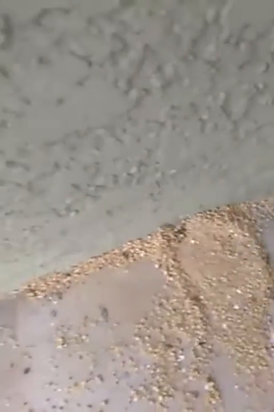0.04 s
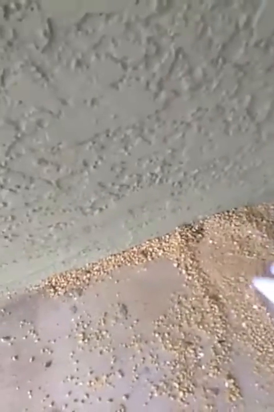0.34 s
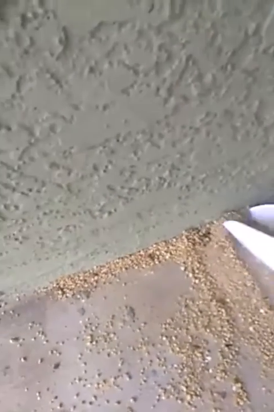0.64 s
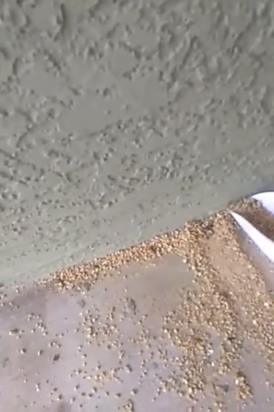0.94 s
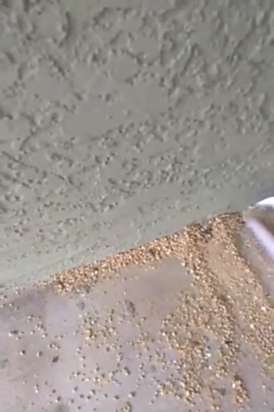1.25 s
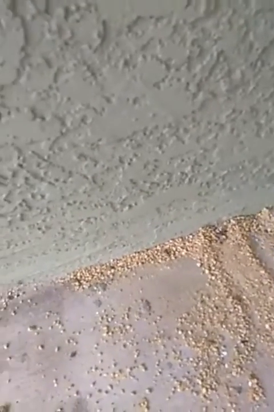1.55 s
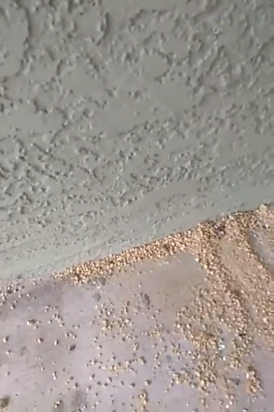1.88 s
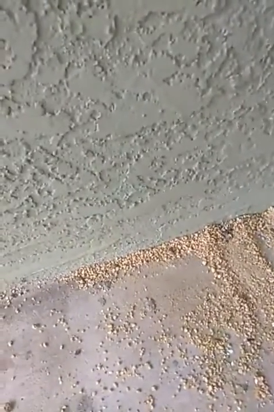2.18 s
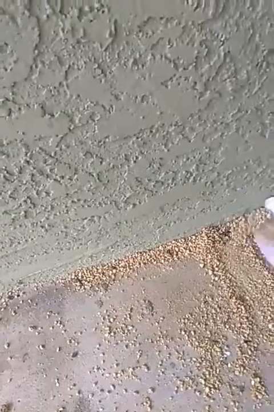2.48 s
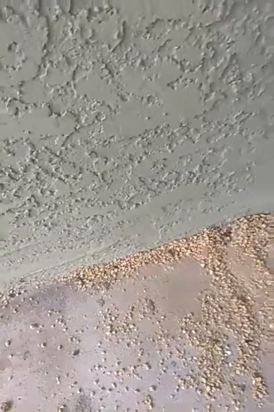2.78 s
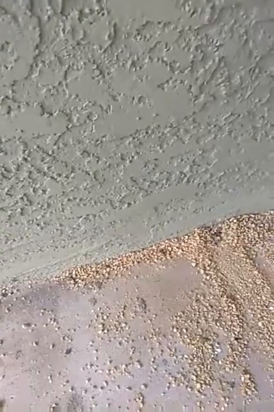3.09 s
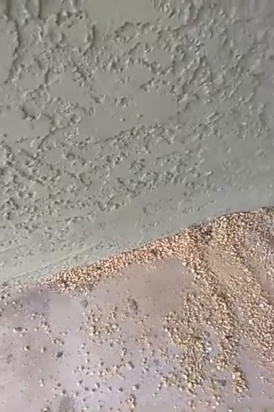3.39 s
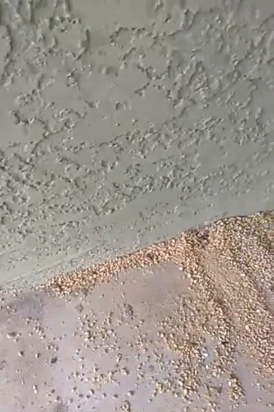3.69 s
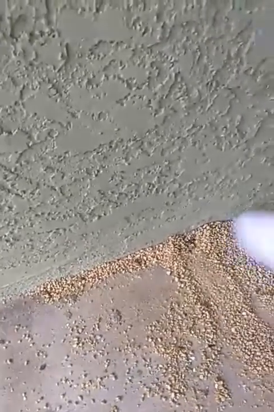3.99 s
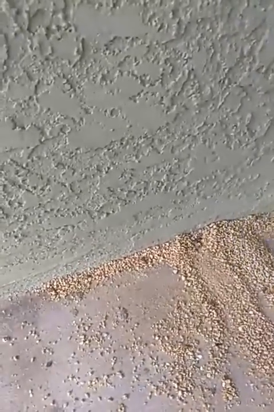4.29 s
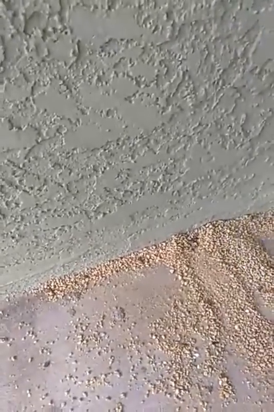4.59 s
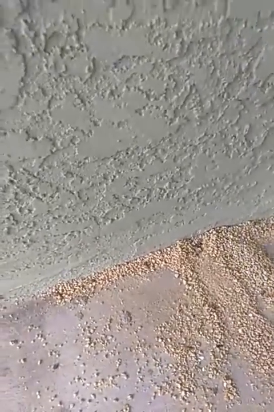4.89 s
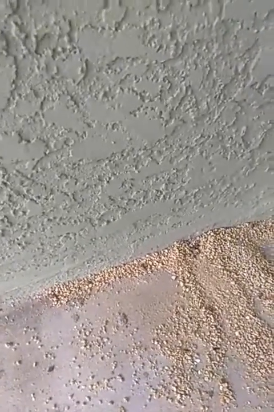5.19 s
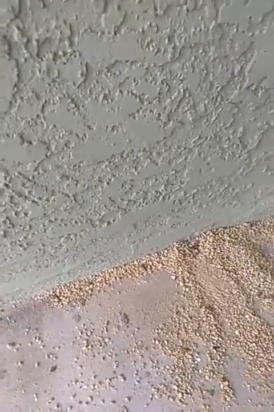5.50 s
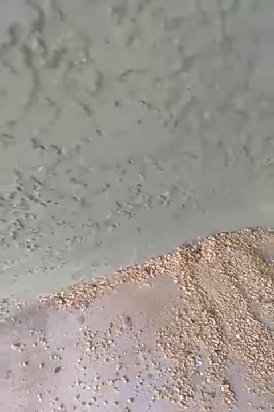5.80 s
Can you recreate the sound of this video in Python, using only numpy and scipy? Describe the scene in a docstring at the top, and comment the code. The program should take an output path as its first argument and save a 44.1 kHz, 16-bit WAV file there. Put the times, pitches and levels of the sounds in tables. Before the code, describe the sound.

Dry kernels crackle and rattle as a plastic bowl scrapes over a concrete floor, gently at first, then in three loud strokes.

```python
"""Scooping grain off concrete

A plastic bowl scoops loose grain beside a wall: light nudges, then three hard scrapes. Kernels crackle
under the rim and tick against the bowl, whose resonances change with each new grip; fine grit trickles
after every push. Far traffic rumbles underneath, and a distant bird chirps once."""
import sys
import numpy as np
from scipy import signal
from scipy.fft import rfft, irfft, next_fast_len
from scipy.io import wavfile
from scipy.ndimage import uniform_filter1d, map_coordinates

SR = 44100
rng = np.random.default_rng(int(sys.argv[2]) if len(sys.argv) > 2 else 0)


def unload_wav(signal):
    """Save mono or channel-first audio to the path in sys.argv[1] as 16-bit WAV at rate SR, clipped to [-1, 1]."""
    wavfile.write(
        sys.argv[1],
        SR,
        np.round(np.clip(np.atleast_2d(signal).T, -1, 1) * 32767).astype(np.int16),
    )


N = 266805


def amp(db):
    """Decibels to gain."""
    return 10 ** (np.asarray(db) / 20)


def unit(x):
    """Scale to rms 1."""
    return x / np.sqrt(np.mean(x ** 2) + 1e-20)


def add(track, sound, start_s):
    """Lay a sound into a track."""
    part = track[:, round(start_s * SR):][:, :sound.shape[1]]
    part += sound[:, :part.shape[1]]


def along(points, hz):
    """Read each column after the frequency at hz, on a log axis."""
    freqs, *columns = np.transpose(points)
    return np.squeeze([np.interp(np.log(hz + 1), np.log(freqs + 1), column) for column in columns])


def automation(rows):
    """Read each column after the time at every sample."""
    times, *columns = np.transpose(rows)
    return np.array([np.interp(np.arange(N) / SR, times, column) for column in columns])


def wobble(rate, size=N):
    """A smooth random curve, rate knots a second."""
    knots = rng.standard_normal(int(size * rate / SR) + 4)
    return map_coordinates(knots, [np.arange(size) * rate / SR])


def filtered(x, response):
    """Equalise x with a gain given as a function of frequency."""
    size = next_fast_len(N + SR // 2)
    return irfft(rfft(x, size) * response(np.fft.rfftfreq(size, 1 / SR)), size)[..., :N]


def convolved(x, ring):
    """Pass x through one impulse response or a pair."""
    return signal.oaconvolve(np.atleast_2d(x), np.atleast_2d(ring), axes=1)[:, :x.shape[-1]]


def colour(eq_db, size=4096):
    """The minimum-phase impulse response, of energy 1, shaped like this EQ curve."""
    gain = amp(eq_db(np.fft.rfftfreq(size, 1 / SR)))
    cepstrum = irfft(np.log(np.maximum(gain, 1e-6)))
    cepstrum[1:size // 2] *= 2
    cepstrum[size // 2 + 1:] = 0
    ring = irfft(np.exp(rfft(cepstrum)))
    return ring / np.linalg.norm(ring)


def shaped_noise(eq):
    """A pair of noises, rms 1, shaped by an EQ table."""
    return unit(filtered(rng.standard_normal((2, N)), lambda hz: amp(along(eq, hz))))


def narrow_noise(hz, width_hz, size=N):
    """A pair of narrow noises, rms 1: a resonance under random drive."""
    phase = 2 * np.pi * hz * np.arange(size) / SR
    pair = [wobble(width_hz, size) * np.cos(phase) + wobble(width_hz, size) * np.sin(phase)
            for _ in range(2)]
    return unit(np.array(pair))


def burst(t60, size=2048):
    """A pair of dying noises of energy 1: one contact and its scatter."""
    x = rng.standard_normal((2, size)) * amp(-60 * np.arange(size) / SR / t60)
    return x / np.linalg.norm(x, axis=1, keepdims=True)


def grains(size, rate, spread_db, clump_db, t60, spots):
    """Random kernel contacts; the load wanders between a few spots, each with its own ring."""
    shape = (spots, size)
    clicks = rng.random(shape) < rate / spots / SR
    clicks = clicks * amp(spread_db * np.clip(rng.standard_normal(shape), -2, 2))
    clicks = clicks * rng.choice([-1, 1], shape) * amp(clump_db * wobble(190, size))
    x = sum(convolved(spot * amp(3 * wobble(16, size)), burst(t60)) for spot in clicks)
    slow_power = np.abs(uniform_filter1d(np.mean(x ** 2, axis=0), SR // 40))
    return x / np.sqrt(slow_power + 1e-12)  # held at rms 1, ready for an envelope


def shifting_gap(x, depth_db):
    """The gap between bowl and floor keeps changing, so peaks and notches wander through the sound."""
    spectrogram = signal.stft(x, nperseg=512)[2]
    ripple = rng.standard_normal(spectrogram.shape)
    for _ in range(2):
        ripple = uniform_filter1d(ripple, size=4, axis=1)  # across frequency
        ripple = uniform_filter1d(ripple, size=8, axis=2)  # across time
    gain = unit(amp(depth_db * np.clip(unit(ripple), -3, 1.5)))
    return signal.istft(spectrogram * gain, nperseg=512)[1][:, :x.shape[1]]


# Stereo image: freq_hz, side_over_mid_db, left_over_right_db
STEREO_IMAGE = [(60, 16.5, -.4), (130, 13.5, 2.2), (260, 12, 1.7), (520, 7.5, 1.8), (1000, 3, .8),
                (2000, .5, 2.2), (4500, -1, 2.5), (6500, -.5, 4.5), (8500, 0, 13), (12500, 0, 21.5)]
def microphones(pair):
    """Two unrelated signals become left and right: opposed in the bass, with the treble on the left."""
    def side_response(hz):
        side_db, balance_db = along(STEREO_IMAGE, hz)
        width, ratio = amp(side_db), amp(balance_db) ** 2
        lean = np.clip((ratio - 1) / (ratio + 1) * (1 + width ** 2) / (2 * width), -1, 1)
        return width * np.array([lean, np.sqrt(1 - lean ** 2)])
    mid, side = pair[0], filtered(pair, side_response).sum(axis=0)
    return np.array([mid + side, mid - side])


# Reverb decay: freq_hz, t60_s
REVERB_DECAY = [(150, 1), (900, 0.83), (3000, 0.62), (7000, 0.4), (13000, 0.37)]
def wall_reverb(x, build_s=0.0033):
    """Wall and floor answer; each frequency dies at its own speed."""
    hz, t, noise = signal.stft(rng.standard_normal((2, SR)), SR, nperseg=256)
    decay = amp(-60 * t / along(REVERB_DECAY, hz)[:, None])
    tail = signal.istft(noise * decay, SR, nperseg=256)[1]
    tail *= 1 - np.exp(-np.arange(tail.shape[1]) / SR / build_s)
    return convolved(x, tail / np.linalg.norm(tail[0]))


# Tone of the traffic rumble, the vehicle drone and the air: freq_hz, gain_db
RUMBLE_EQ = [(15, -8), (35, -9.5), (56, 10), (75, 3), (92, -0.5), (110, 2), (140, -11), (260, -14.5),
             (600, -33.5)]
DRONE_EQ = [(90, -46), (135, -7), (165, -3.5), (205, -7.5), (260, -10.5), (500, -48)]
AIR_EQ = [(100, -43), (250, 0), (450, 4.5), (750, 3.5), (1200, -3.5), (2000, -12), (5000, -28),
          (8000, -33.5), (12500, -54), (16000, -88)]
# Fader rides of rumble and drone: time_s, level_db
RUMBLE_FADER = [(0, -58), (0.7, -52), (1.15, -50.5), (1.45, -60.5), (1.8, -53), (2.3, -56), (2.9, -56),
                (3.25, -53), (3.55, -55.5), (3.9, -62), (4.15, -53.5), (4.75, -59.5), (5.3, -55),
                (6.0, -52.5)]
DRONE_FADER = [(0, -65), (2.9, -66), (3.35, -54.5), (5.5, -56), (6.05, -62.5)]
def outdoor_bed(flutter_db=1.35, air_db=-63):
    """Far traffic rumbles and one droning vehicle comes and goes under a steady thin hiss."""
    rumble = amp(automation(RUMBLE_FADER) + flutter_db * wobble(11)) * shaped_noise(RUMBLE_EQ)
    drone = amp(automation(DRONE_FADER)) * shaped_noise(DRONE_EQ)
    return rumble + drone + amp(air_db) * shaped_noise(AIR_EQ)


# Fader ride of the engine: time_s, level_db
ENGINE_FADER = [(0, -61), (1.3, -61.5), (1.8, -70), (6.05, -70)]
def far_engine():
    """A distant engine hums on one low, unsteady note."""
    return amp(automation(ENGINE_FADER)) * narrow_noise(hz=107, width_hz=13)


# Contour of the chirp: time_s, pitch_hz, level_db
CHIRP_CONTOUR = [(2.765, 2660, -68), (2.782, 2564, -53.5), (2.80, 2525, -55), (2.822, 2220, -48.5),
                 (2.845, 2257, -56), (2.87, 2250, -62)]
def bird(direct_db=-3, echo_db=-9, hoarseness=0.024, fade_s=.005):
    """One far falling chirp, slightly hoarse and blurred by a short echo."""
    pitch_hz, level_db = automation(CHIRP_CONTOUR)
    phase = 2 * np.pi * np.cumsum(pitch_hz * (1 + hoarseness * wobble(500))) / SR
    start, end = CHIRP_CONTOUR[0][0], CHIRP_CONTOUR[-1][0]
    gate = np.interp(np.arange(N) / SR, [start - fade_s, start, end, end + fade_s], [0, 1, 1, 0])
    note = np.sqrt(2) * amp(level_db) * gate * np.sin(phase)
    return amp(direct_db) * note + amp(echo_db) * convolved(note, burst(t60=.2, size=8192))


# Sizzle of fine grit: freq_hz, gain_db
GRIT_EQ = [(2500, -22), (5500, -28.5), (8500, -6.5), (10800, -4.5), (12500, 1.5), (14000, -7), (16000, -12)]
# Gentle slides off the heap: centre_s, half_length_s, level_db
GRIT_SLIDES = [(0.033, 0.064, -57.5), (1.08, 0.25, -59.5), (1.62, 0.087, -59), (1.8, 0.15, -57.5),
               (2.996, 0.18, -58.5), (3.204, 0.19, -65)]
def grit_trickle(run_db=-40, seep_db=-69.5, growth=0.56, settle_db_per_s=36):
    """Fine grit seeps all the time, swells in slides, and runs after every push, more for a harder one."""
    t = np.arange(N) / SR
    flow = np.zeros(N)
    for start, length, crackle_db, *_ in BOWL_PUSHES:
        rise = np.clip((t - start) / length, 0, 1)
        settled_db = settle_db_per_s * np.maximum(t - start - length, 0)
        flow = np.maximum(flow, rise * amp(growth * crackle_db - settled_db))
    slide_power = sum((amp(db) * np.exp(-.5 * ((t - centre) / half) ** 2)) ** 2
                      for centre, half, db in GRIT_SLIDES)
    level = np.sqrt((amp(run_db) * flow) ** 2 + slide_power + amp(seep_db) ** 2)
    grit = grains(N, rate=6000, spread_db=3, clump_db=.8, t60=.01, spots=8)
    return level * convolved(shifting_gap(grit, depth_db=1.5), colour(lambda hz: along(GRIT_EQ, hz)))


# A new grip for each stroke: start_s, hollow_db (boost to the shell's low end)
BOWL_GRIPS = [(0.0, 0.5), (1.5, 13.5), (2.1, 14), (2.85, 8), (3.7, 1), (4.44, -3.5), (5.1, -3.5), (5.65, 1)]
def grip_at(time_s):
    """Index of the grip that holds at this time."""
    return sum(start <= time_s for start, _ in BOWL_GRIPS[1:])


# Tone of kernel crackle, rim rasp and bowl shell: freq_hz, gain_db
CRACKLE_EQ = [(3000, -54), (6500, -17.5), (8500, -13), (10500, -11), (11700, -2.5), (12500, 1), (13500, -2),
              (15000, -14), (16000, -10)]
RASP_EQ = [(600, -21.5), (1500, -13.5), (2200, 0), (3000, 3), (3900, 2), (5100, 0.5), (6500, 1.5),
           (8000, -2.5), (11000, 3), (16000, -74.5)]
SHELL_EQ = [(60, -32), (130, -15), (210, -7), (310, -7), (520, -5.5), (750, -0.5), (1250, 2.5), (1600, -1),
            (2100, -13.5), (4000, -24)]
# The bowl's resonances, one list a grip: centre_hz, width_hz, lift_db
BOWL_RESONANCES = [
    [(456, 150, 9), (1350, 400, -1.5), (3950, 690, 5)],
    [(500, 670, 7), (2220, 1100, 5), (7540, 2500, 6)],
    [(900, 250, 3), (3180, 980, 5.5), (4540, 350, 3.5)],
    [(780, 160, 10), (1130, 330, 5.5), (2000, 400, 3.5), (4600, 500, 3.5)],
    [(227, 72, 4), (758, 125, 6), (1100, 320, 4.5), (2050, 340, 5), (2910, 220, 4)],
    [(474, 123, -1.5), (1080, 400, 3), (2250, 330, 7), (3810, 500, 4)],
    [(710, 97, 3.5), (1220, 270, 4), (2130, 390, 6), (3830, 670, 1.5)],
    [(884, 76, 4), (1160, 320, 5), (2254, 180, 2)],
]
def bowl_colours(grip, hollow_hz=600):
    """Impulse responses of crackle, rasp and shell: the grip's resonances colour all three."""
    _, hollow_db = BOWL_GRIPS[grip]
    lift = lambda hz: sum(db / (1 + ((hz - centre) / (width / 2)) ** 2)
                          for centre, width, db in BOWL_RESONANCES[grip])
    hollow = lambda hz: hollow_db / (1 + (hz / hollow_hz) ** 4)
    return [colour(lambda hz: along(CRACKLE_EQ, hz) + lift(hz)),
            colour(lambda hz: along(RASP_EQ, hz) + lift(hz)),
            colour(lambda hz: along(SHELL_EQ, hz) + lift(hz) + hollow(hz))]


# Hollow rubbing tones: start_s, end_s, pitch_hz, width_hz, level_db
RUB_TONES = [(0.199, 0.52, 461.5, 45.2, -53.5), (0.836, 0.996, 393, 48.7, -51), (1.7, 1.93, 509, 56.5, -58),
             (3.8, 4.086, 551.4, 109.7, -41.5), (3.89, 4.066, 220.2, 99, -41),
             (4.53, 4.787, 180.3, 90.8, -48.5), (5.17, 5.38, 182.5, 94, -49.5)]
def bowl_rubs():
    """The wall of the bowl hums briefly as it rubs, swelling and fading."""
    out = np.zeros((2, N))
    for start, end, pitch_hz, width_hz, level_db in RUB_TONES:
        size = round((end - start) * SR)
        envelope = amp(level_db) * np.sqrt(np.hanning(size))
        add(out, envelope * narrow_noise(pitch_hz, width_hz, size), start)
    return out


def impacts(colours, events, rattle_db, rattle_t60, t60s=(.011, .016, .018)):
    """Each hit layers a sharp tick, a rim snap and a shell knock; jolted kernels rattle after it."""
    out = np.zeros((2, N))
    hit_gain = np.sqrt(.005 * SR)  # the energy of 5 ms at rms 1
    for start, *levels_db in events:
        for gain, t60, ring in zip(hit_gain * amp(levels_db), t60s, colours[grip_at(start)]):
            contact = burst(t60, size=4096) + amp(rattle_db) * burst(rattle_t60, size=4096)
            add(out, convolved(gain * contact, ring), start)
    return out


# Bumps on the floor: start_s, knock_db
FLOOR_BUMPS = [(0.228, -46.5), (0.412, -41), (0.5907, -43), (0.802, -45), (2.164, -46.5), (2.564, -51),
               (3.2671, -34.5), (3.3032, -47), (3.757, -41), (3.9944, -19.5), (4.0534, -32), (4.2458, -56),
               (4.4811, -35.5), (5.1294, -46.5), (5.8034, -38)]
def floor_bumps(colours, tick_offset_db=-6, snap_offset_db=-10):
    """The bowl bumps the concrete: mostly shell knock, with a loose rattle."""
    events = [(start, db + tick_offset_db, db + snap_offset_db, db) for start, db in FLOOR_BUMPS]
    return impacts(colours, events, rattle_db=1, rattle_t60=.14)


# Cracking kernels: start_s, tick_db, snap_db
KERNEL_CRACKS = [(0.175, -30.5, -34), (0.1853, -35, -52), (0.229, -37.5, -45), (0.29, -33, -40),
                 (0.301, -36, -42), (0.312, -40, -48), (0.332, -26.5, -34), (0.4095, -32, -40.5),
                 (0.414, -32.5, -42), (0.469, -38, -47), (0.515, -39, -57), (0.604, -40, -44),
                 (0.625, -40, -52), (0.696, -38, -50), (1.451, -61, -72), (2.1719, -33.5, -46.5),
                 (2.209, -42, -49), (2.2364, -27.5, -35), (2.4359, -37, -40), (2.454, -32.5, -35.5),
                 (3.26, -36, -56), (3.305, -34, -49), (3.387, -31, -49), (3.8076, -23.5, -31.5),
                 (3.881, -27, -31), (3.8978, -17, -26), (3.914, -29, -30), (3.9615, -16.5, -24.5),
                 (3.977, -23, -32), (4.4793, -22.5, -31.5), (4.562, -28, -36), (4.58, -28, -31),
                 (4.591, -14, -20.5), (4.641, -32, -32), (4.6544, -21, -25), (4.6608, -16.5, -23.5),
                 (4.7033, -23, -36), (5.1918, -26, -39), (5.2435, -18.5, -26), (5.2575, -29, -28),
                 (5.2744, -16, -26), (5.2835, -19, -25.5), (5.3435, -17.5, -30.5), (5.7065, -17.5, -29)]
def kernel_cracks(colours, knock_offset_db=-21):
    """A kernel cracks under the rim: a bright tick and snap with little body."""
    events = [(start, tick, snap, tick + knock_offset_db) for start, tick, snap in KERNEL_CRACKS]
    return impacts(colours, events, rattle_db=-8, rattle_t60=.07)


def push_envelopes(length, levels_db, swell_db, attack_s=.011, arch_db=2.5, tail_s=.25):
    """Gains of crackle, rasp and shell in one push: the rim bites, the force arches, then lets go."""
    t = np.arange(round((length + tail_s) * SR)) / SR
    from_middle = np.minimum(t / length, 1) - .5
    force_db = swell_db * from_middle - arch_db * (2 * from_middle) ** 2
    release_db_per_s = [333, 357, 304]
    release_db = np.outer(release_db_per_s, np.maximum(t - length, 0))
    return np.minimum(t / attack_s, 1) * amp(np.array(levels_db)[:, None] + force_db - release_db)


# Pushes of the hand: start_s, length_s, crackle_db, rasp_db, shell_db, swell_db (start to end)
BOWL_PUSHES = [(0.141, 0.073, -47.5, -50.5, -53.5, 9), (0.212, 0.14, -45.5, -45, -47.5, -4),
               (0.322, 0.17, -42, -45.5, -51.5, 8), (0.502, 0.089, -48.5, -51.5, -61, 13),
               (0.584, 0.037, -39, -44, -61, -1), (0.641, 0.15, -43, -47, -56.5, 9.5),
               (0.86, 0.15, -58.5, -60.5, -55, -10.5), (1.001, 0.035, -49.5, -70, -59.5, 3),
               (1.083, 0.066, -58, -61, -54, -4), (1.246, 0.02, -42.5, -64, -71, -5),
               (1.518, 0.14, -66, -67.5, -56.5, 4), (1.675, 0.067, -52, -52.5, -51, 0),
               (1.749, 0.19, -64, -63.5, -56, -14), (2.153, 0.085, -45.5, -55.5, -53.5, 3),
               (2.233, 0.036, -38, -41, -53.5, 3.5), (2.302, 0.092, -47, -52.5, -55, 0),
               (2.38, 0.062, -43, -46.5, -56, 1), (2.444, 0.075, -37, -43, -55, -5.5),
               (2.553, 0.1, -51.5, -56.5, -53, -9.5), (3.135, 0.11, -56.5, -60, -52.5, 8),
               (3.229, 0.042, -44, -47.5, -39, 13), (3.295, 0.06, -44, -53.5, -50.5, 2),
               (3.34, 0.06, -36.5, -43.5, -41.5, 1.5), (3.422, 0.045, -50.5, -60.5, -57, 6.5),
               (3.751, 0.084, -49, -48, -42, 2), (3.797, 0.11, -31.5, -30, -27.5, 4),
               (3.89, 0.097, -24.5, -28, -20.5, 8.5), (3.985, 0.061, -30.5, -38, -17.5, -11.5),
               (4.485, 0.067, -42, -46.5, -40, 18), (4.536, 0.12, -31.5, -30, -30, 4),
               (4.665, 0.1, -26, -26.5, -28, 4), (5.158, 0.078, -31.5, -30, -33, 11.5),
               (5.235, 0.044, -22.5, -22.5, -28, 7.5), (5.281, 0.069, -26, -27.5, -28.5, -0.5),
               (5.696, 0.011, -34, -38, -37.5, -4), (5.705, 0.11, -51, -48.5, -44, -14),
               (5.786, 0.098, -47, -46.5, -48, 3.5), (5.87, 0.16, -43.5, -49.5, -56, 1)]
def bowl_scrapes(colours, trims_db=(0, 0, -1)):
    """Each push crushes and rolls kernels, grinds the rim on the concrete and shakes the shell."""
    out = np.zeros((2, N))
    for grip, rings in enumerate(colours):
        pushes = [push for push in BOWL_PUSHES if grip_at(push[0]) == grip]
        stroke_start = pushes[0][0]
        size = round((pushes[-1][0] - stroke_start + .5) * SR)
        power = np.zeros((3, size))
        for start, length, *levels_db, swell_db in pushes:
            add(power, push_envelopes(length, levels_db, swell_db) ** 2, start - stroke_start)
        envelopes = np.sqrt(power) * amp(trims_db)[:, None]
        crackle = grains(size, rate=3000, spread_db=4, clump_db=1.2, t60=.006, spots=7)
        rasp = grains(size, rate=1600, spread_db=4, clump_db=1.4, t60=.012, spots=7)
        shell = grains(size, rate=2000, spread_db=3, clump_db=.8, t60=.03, spots=6)
        layers = [shifting_gap(crackle, depth_db=3.5), shifting_gap(rasp, depth_db=4.5),
                  shifting_gap(shell, depth_db=4)]
        for envelope, layer, ring in zip(envelopes, layers, rings):
            add(out, convolved(envelope * layer, ring), stroke_start)
    return out


def scene(reverb_db=-18.5):
    """The bowl close by, its reverb and trickling grit, over the distant outdoors."""
    colours = [bowl_colours(grip) for grip in range(len(BOWL_GRIPS))]
    bowl = kernel_cracks(colours) + floor_bumps(colours) + bowl_scrapes(colours) + bowl_rubs()
    engine = far_engine()
    foreground = bowl + amp(reverb_db) * wall_reverb(bowl) + grit_trickle()
    return microphones(foreground + bird() + outdoor_bed() + engine)


def record(dry, cutoff_hz=15800):
    """Clip any peaks at full scale, then cut the top with a steep low-pass."""
    return filtered(np.clip(dry, -1, 1), lambda hz: 1 / np.sqrt(1 + (hz / cutoff_hz) ** 200))


dry = scene()
out = record(dry)
unload_wav(out)
```